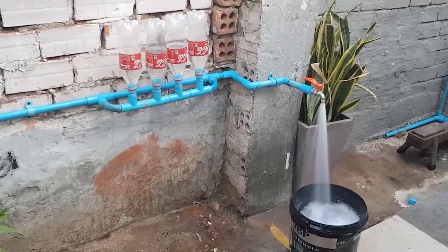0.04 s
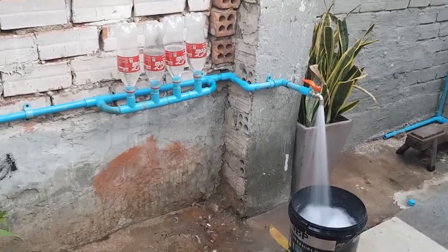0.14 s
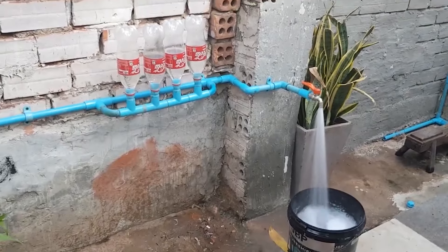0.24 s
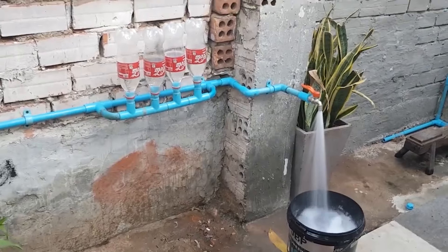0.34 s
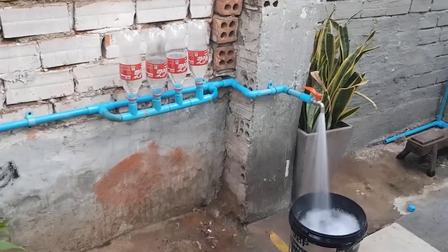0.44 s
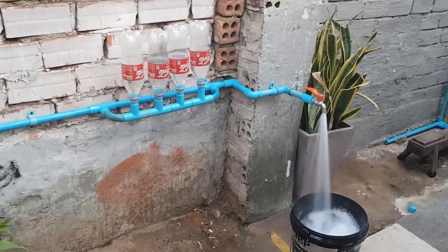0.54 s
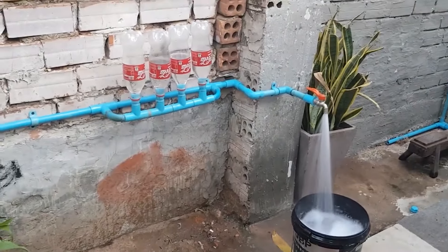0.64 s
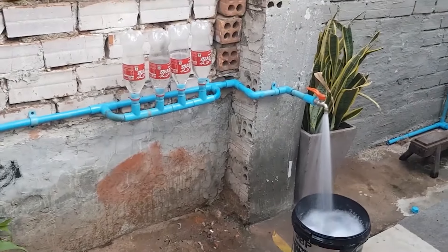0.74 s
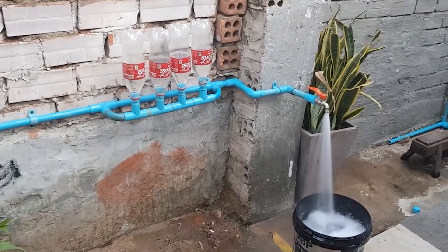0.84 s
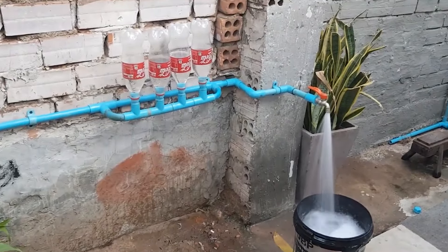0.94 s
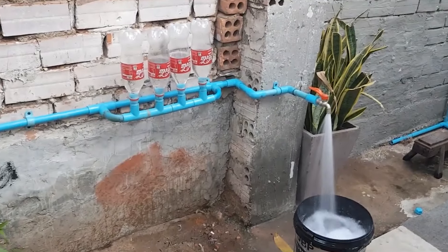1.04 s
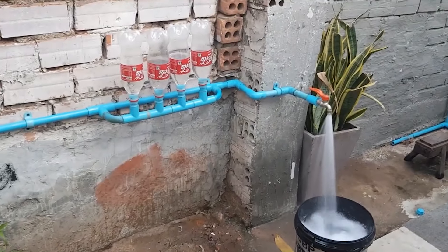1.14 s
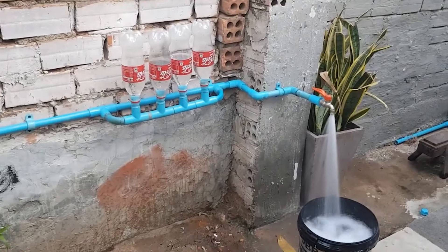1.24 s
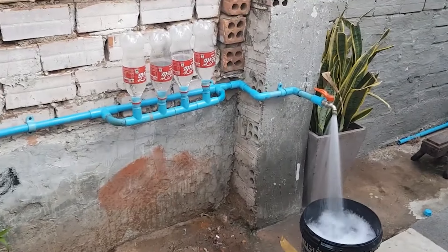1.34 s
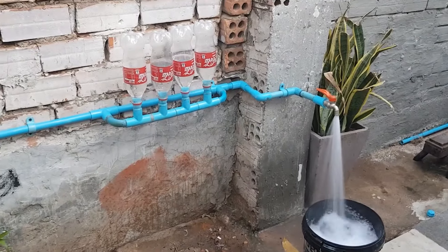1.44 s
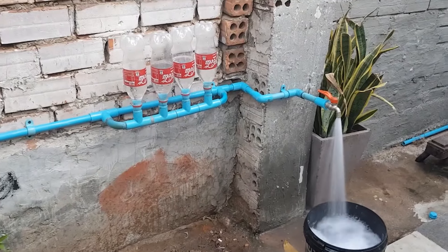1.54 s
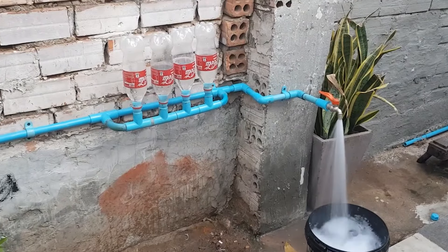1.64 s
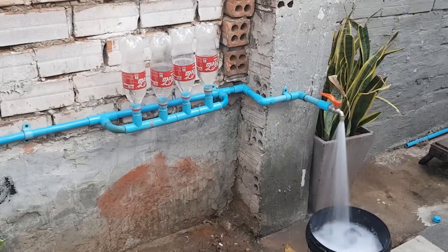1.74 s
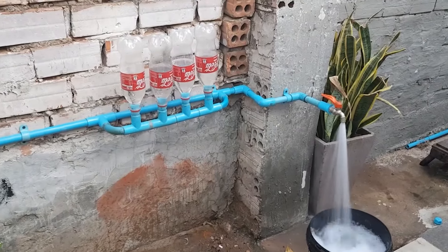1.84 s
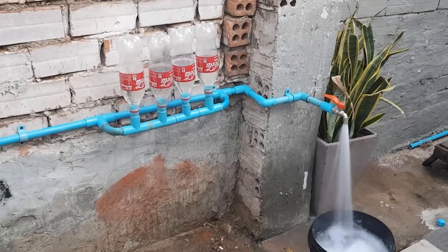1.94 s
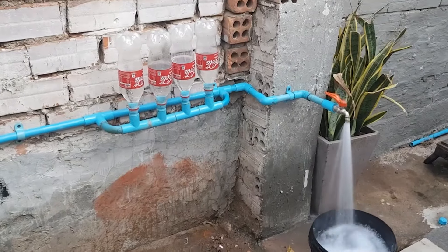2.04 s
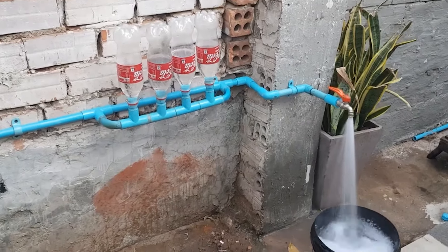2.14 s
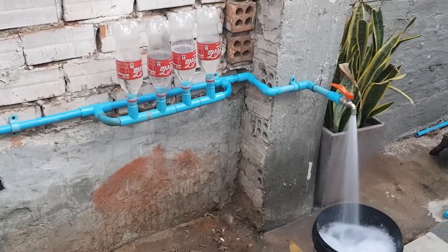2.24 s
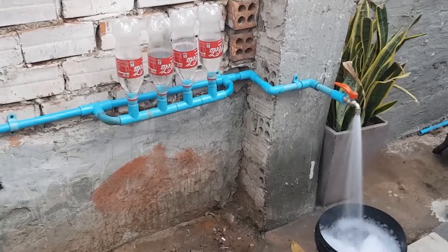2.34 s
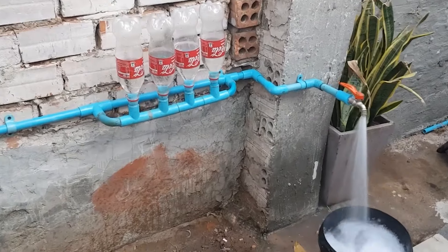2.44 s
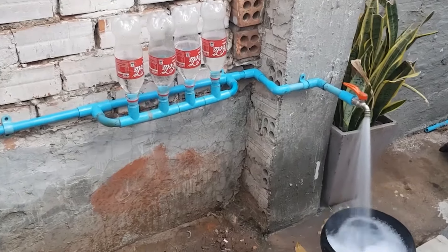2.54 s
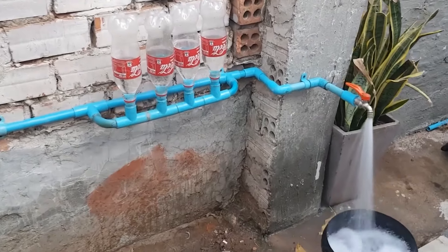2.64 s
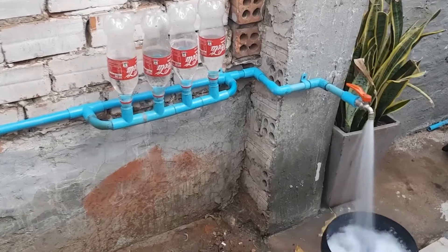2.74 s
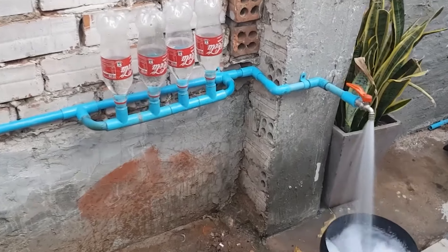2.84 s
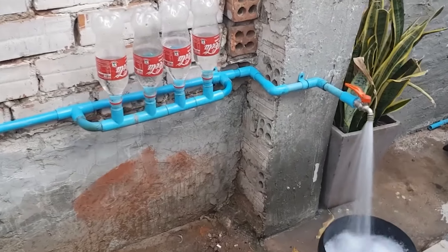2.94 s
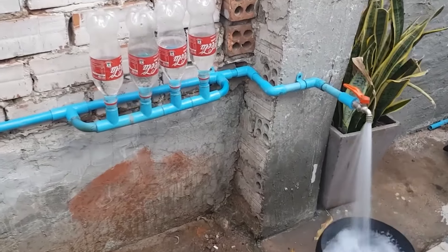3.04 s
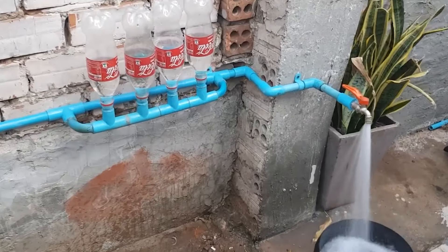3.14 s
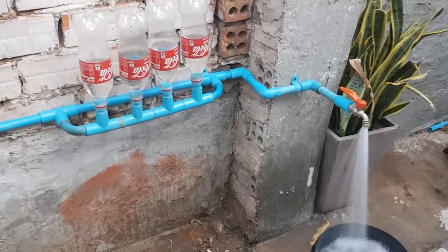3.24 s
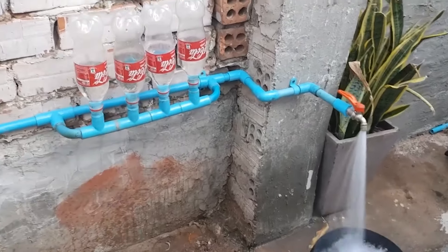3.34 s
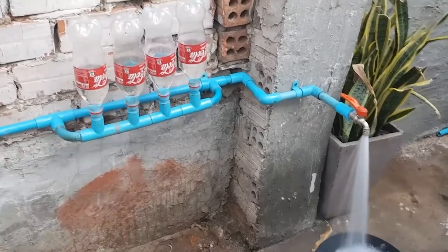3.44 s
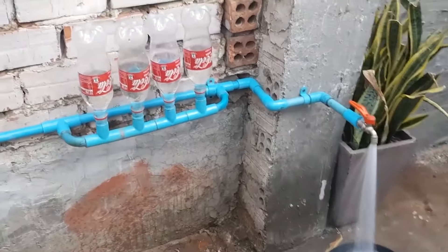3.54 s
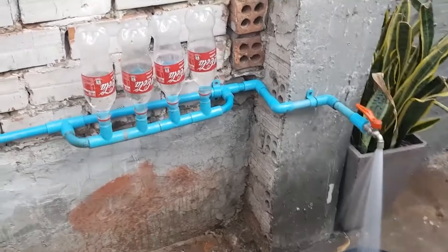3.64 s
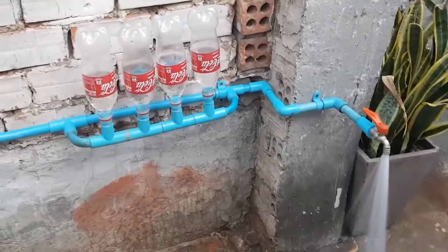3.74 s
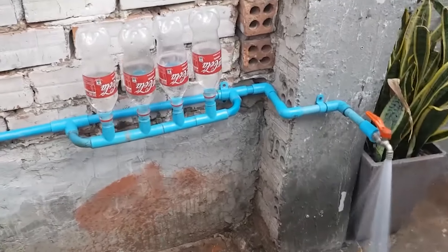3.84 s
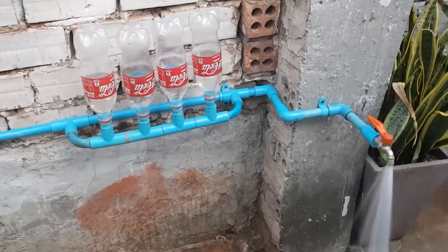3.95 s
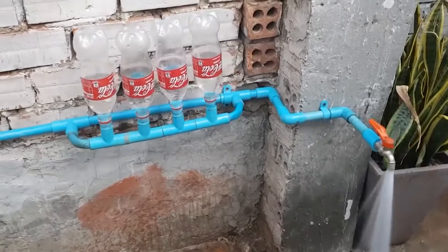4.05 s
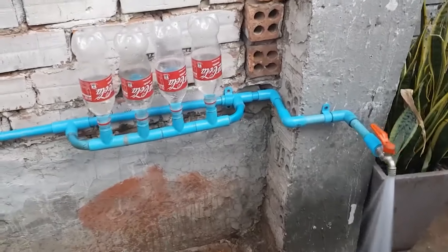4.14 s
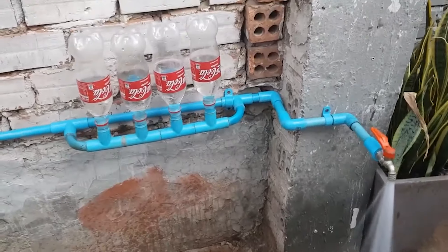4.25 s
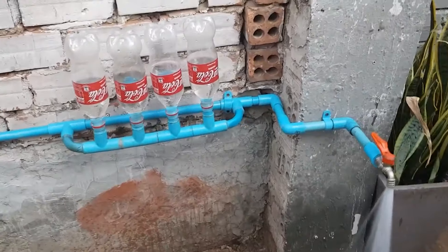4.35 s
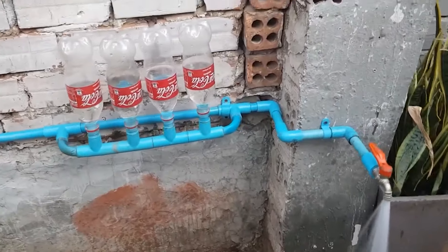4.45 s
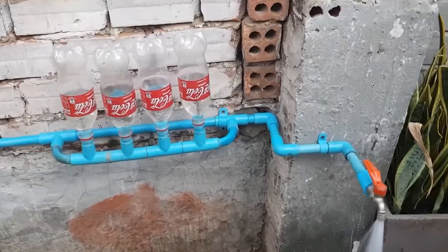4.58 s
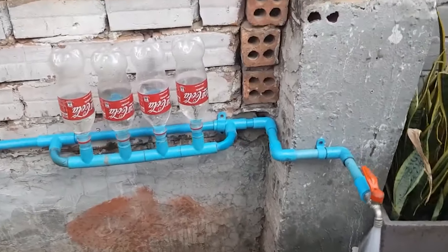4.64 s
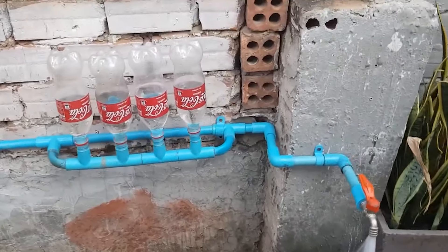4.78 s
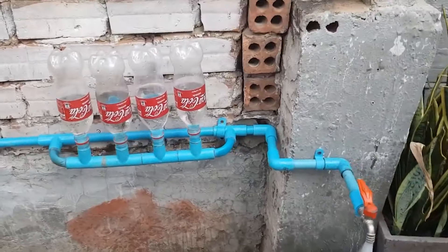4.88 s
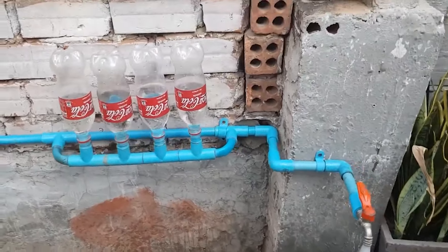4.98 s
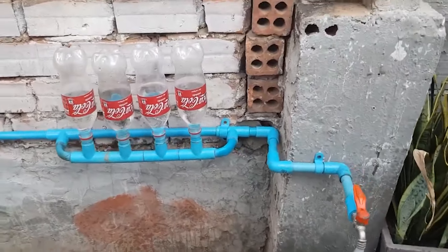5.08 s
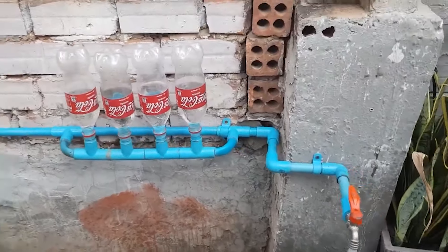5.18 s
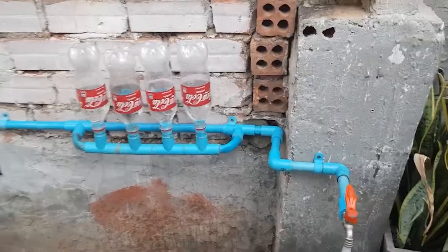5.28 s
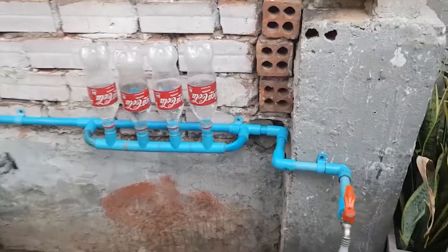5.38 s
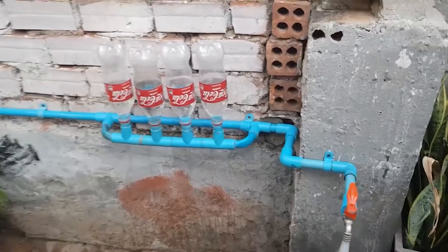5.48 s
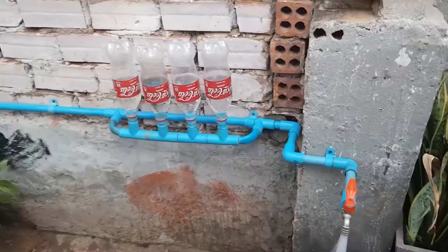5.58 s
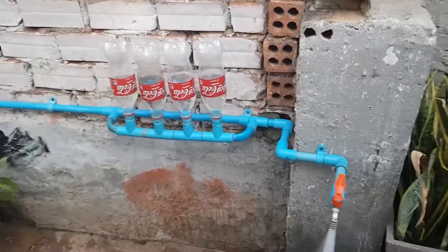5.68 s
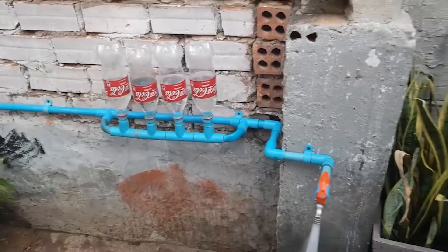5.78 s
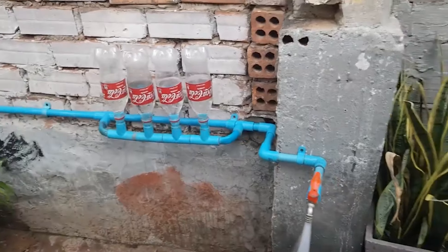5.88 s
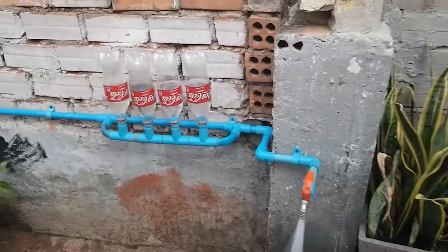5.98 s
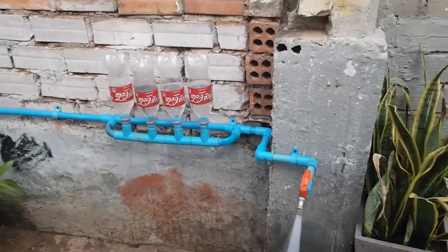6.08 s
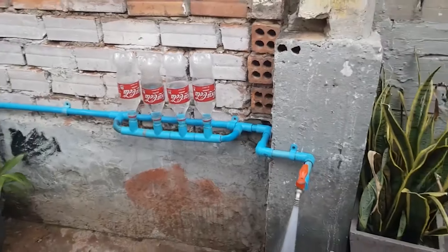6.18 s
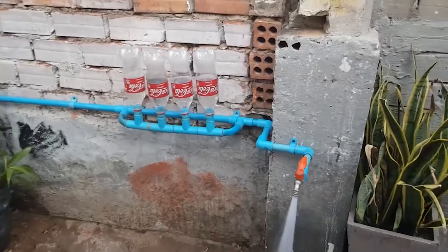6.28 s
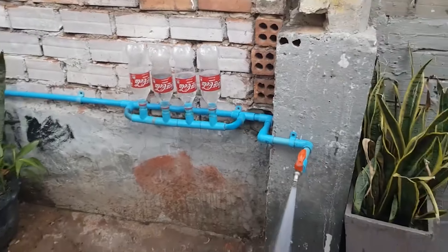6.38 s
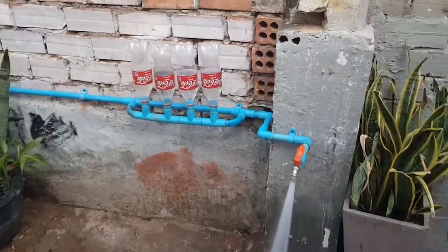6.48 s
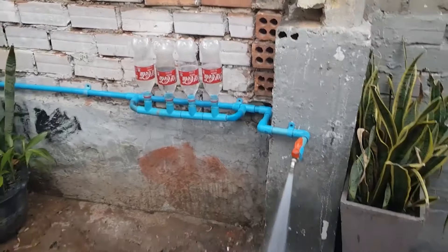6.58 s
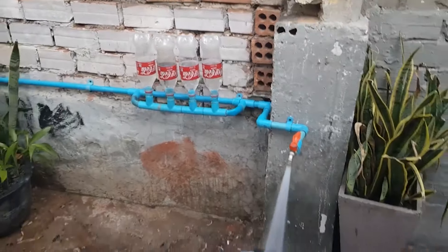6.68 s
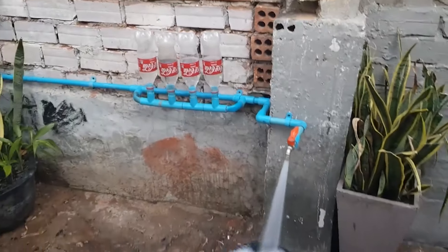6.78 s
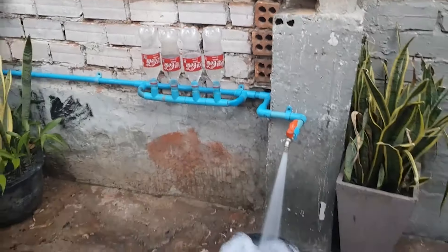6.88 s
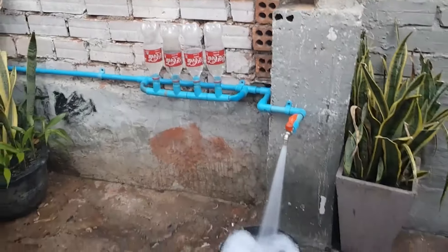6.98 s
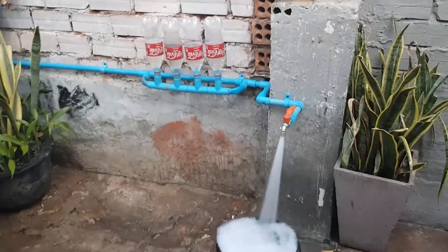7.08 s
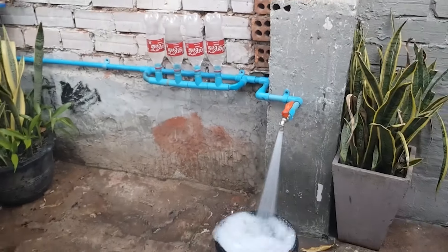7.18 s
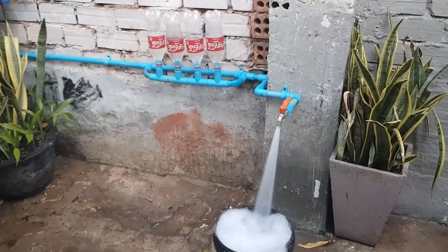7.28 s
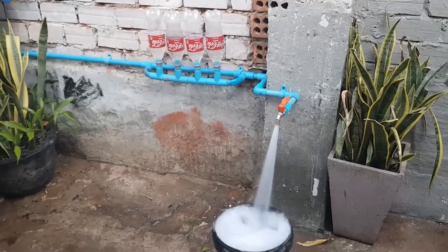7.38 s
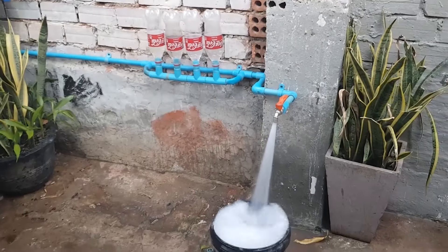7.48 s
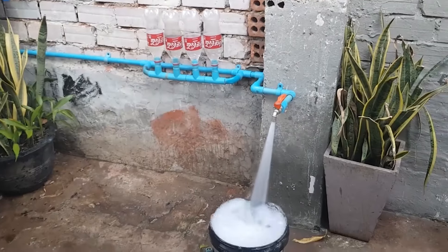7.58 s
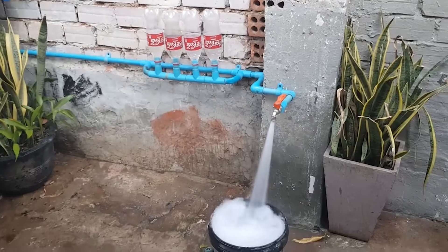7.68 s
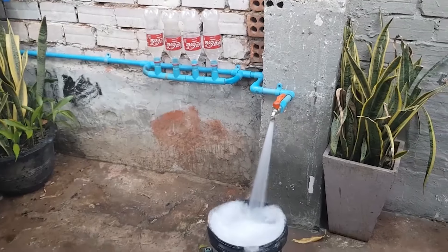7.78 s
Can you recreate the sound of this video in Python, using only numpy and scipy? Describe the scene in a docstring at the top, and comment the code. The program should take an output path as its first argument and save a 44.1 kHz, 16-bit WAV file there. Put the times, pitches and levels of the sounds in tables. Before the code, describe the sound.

Constant loud rush of water striking water in a bucket, close and outdoors by a brick wall. Bubbles gurgle and plop, low gulps sound beneath, and fine droplets patter and hiss. Slight air puffs buffet the moving stereo microphone early on. Midway it nears the tap and the hiss brightens, then it backs away with a hollow ring and slightly softer splashing, never stopping.

```python
"""A strong jet from a garden tap plunges into a foaming plastic bucket by a brick wall: shaped noise
and rising sine bubbles make the churn, and noise-driven resonances make the bucket hum.
Spray and bursting foam hiss on top as bands of noise and tiny tones; puffs of air buffet the microphone.
The microphone walks past, so echoes from wall and ground slowly sweep hollows through the rush."""
import sys
import numpy as np
from scipy import signal
from scipy.fft import rfft, irfft
from scipy.io import wavfile
from scipy.ndimage import uniform_filter1d

SR = 44100
rng = np.random.default_rng(int(sys.argv[2]) if len(sys.argv) > 2 else 0)


def int16_out(signal):
    """Quantize to a 16-bit WAV file."""
    q = np.round(np.clip(np.atleast_2d(signal).T, -1, 1) * 32767)
    wavfile.write(sys.argv[1], SR, q.astype(np.int16))


N = 344862
FRAME, HOP = 2048, 512  # spectral frame and its step [samples]
HZ = np.fft.rfftfreq(FRAME, 1 / SR)
FRAME_S = np.arange(N // HOP + 3) * HOP / SR
TIME = np.arange(N) / SR


def amp(db):
    """Turns decibels into a linear gain."""
    return 10 ** (np.asarray(db) / 20)


def unit(x):
    """Scales to rms 1."""
    return x / np.sqrt(np.mean(x ** 2) + 1e-20)


def follow(rows, times):
    """Reads the columns of a curve table at the given times, with straight lines between rows."""
    s, *columns = np.transpose(rows)
    return np.array([np.interp(times, s, column) for column in columns])


def colour(points):
    """Gain for each frequency of a short spectrum, joined by lines over log frequency."""
    hz, db = np.transpose(points)
    return amp(np.interp(np.log(HZ + 1), np.log(hz), db))


def resonance(hz, width_hz):
    """A bell-shaped resonance of gain 1 at its centre."""
    return 1 / (1 + ((HZ - hz) / (.78 * width_hz)) ** 2)


def waver(low_hz, high_hz):
    """Slow random wobble between two rates, rms 1."""
    hz = np.fft.rfftfreq(N, 1 / SR)
    band = (hz > low_hz) / np.sqrt(hz + 1) / (1 + (hz / high_hz) ** 4)
    return unit(irfft(rfft(rng.standard_normal(N)) * band, N))


def passing(spot_s, stay_s):
    """Rises smoothly from 0 to 1 and falls again around a moment."""
    return np.exp(-((TIME - spot_s) / stay_s) ** 2)


# the microphone nears the bucket, then backs away: (time [s], gain [dB])
NEARNESS = [(0, -1.5), (.85, -1.7), (1.25, -1.5), (2.05, -1), (2.3, 0), (3.6, 0), (4.2, 0), (4.65, 0.7),
            (5.0, .5), (5.83, -0.8), (6.05, -0.6), (7.0, -1.1), (7.3, -2.5), (7.82, -2)]


def nearness():
    """Gain in dB from the microphone's distance to the bucket."""
    return follow(NEARNESS, TIME)[0]


# path of the microphone: (time [s], lag of the left port [ms], left minus right [dB])
WALK = [(0, .09, -.2), (1.2, .11, -1.2), (3.8, .12, -.4), (5.3, .083, -.2), (6.2, .03, 1.2),
        (7.82, .013, 1)]


def rush(shape, level_db, direct, patchy_db, apart_hz=1700):
    """Countless tiny splashes merge into noise of this shape, heard at two microphone ports."""
    a, b, c, d, patches = rng.standard_normal((5, len(FRAME_S), len(HZ)))
    lag_ms = follow(WALK, FRAME_S)[0][:, None]
    direct = np.clip(direct, 0, 1)
    # direct sound reaches the left port late; the yard's diffuse sound is most alike in the bass
    direct_part = direct * np.exp(2j * np.pi * HZ * lag_ms / 10 ** 3)
    alike = direct_part + (1 - direct) * 0.96 * np.sinc(HZ / apart_hz)
    left = a + 1j * b
    right = alike * left + np.sqrt(np.maximum(1 - abs(alike) ** 2, 0)) * (c + 1j * d)
    # smoothed over time and frequency, the noise becomes lumpy
    patches = uniform_filter1d(patches, size=5, axis=0)
    patches = unit(uniform_filter1d(patches, size=24, axis=1))
    shape = shape / np.linalg.norm(shape, axis=-1, keepdims=True)
    z = np.array([left, right]) * shape * amp(patchy_db * patches)
    sound = signal.istft(z.transpose(0, 2, 1), nperseg=FRAME, noverlap=FRAME - HOP)[1][:, :N]
    return amp(level_db) * unit(sound)


def grains(low_hz, high_hz, per_s, cycles, rise, spread_db, width, count=36):
    """Single bubbles and drops: short dying tones that rise in pitch, of many sizes, rms 1."""
    out = np.zeros((2, N))
    for hz in np.geomspace(low_hz, high_hz, count) * rng.uniform(0.94, 1.03, count):
        age = np.arange(int(5 * cycles * SR / hz) + 2) * hz / SR / cycles  # in decay times
        envelope = np.exp(-age) * (1 - np.exp(-8 * age))
        ring = envelope * np.exp(2j * np.pi * cycles * (age + rise * age ** 2 / 2))
        at, draw = rng.integers(0, N, 4000), rng.exponential(1, 4000)
        n = int(per_s * N / SR / count)
        births = np.bincount(at[:n], amp(spread_db * np.minimum(draw[:n], 4)), N)
        turn = np.exp(1j * width * rng.standard_normal())  # each size reaches the ports out of step
        pair = np.array([ring.imag, (ring * turn).imag])
        out += signal.oaconvolve(births[None], pair, axes=1)[:, :N] * np.sqrt(hz)
    low_cut = signal.butter(2, low_hz / 2, "high", fs=SR, output="sos")
    return unit(signal.sosfilt(low_cut, out))


# spectrum of the deep rumble: (frequency [Hz], relative level [dB])
PLUNGE = [(20, -50), (40, -44), (62, -5), (100, 0), (130, -2), (175, 2.5), (205, -3.5), (245, 0),
          (300, -6.5), (400, -8.5), (700, -37)]
# loudness of the rumble: (time [s], level [dB])
RUMBLE = [(0, -45.5), (2.2, -44.2), (3.5, -45), (5.5, -45), (7.82, -46)]


def plunge():
    """The jet drives air deep under water: a low, lumpy rumble."""
    return rush(colour(PLUNGE), follow(RUMBLE, TIME)[0], direct=.1, patchy_db=1.3)


# the churning water, levels before nearness and layer trims: (time [s], pitch of the bubble cloud [Hz],
# its width [Hz], its level [dB], level of the splashing surface [dB])
CLOUD = [(0, 740, 432, -42.5, -38.5), (.7, 756, 444, -39, -38.5), (1.5, 760, 450, -39.5, -37),
         (2.3, 730, 340, -39.5, -38), (3, 776, 420, -40.5, -37), (3.8, 850, 483, -37.5, -37),
         (4.9, 1036, 600, -38, -37.5), (5.6, 950, 540, -36, -35.5), (6.4, 843, 320, -38, -38.5),
         (7.82, 800, 314, -38, -36)]


def bubble_cloud():
    """The cloud under the jet rings as a whole, in quick surges, and large bubbles gurgle out of it."""
    level_db = nearness() + follow(CLOUD, TIME)[2]
    pitch_hz, width_hz = follow(CLOUD, FRAME_S)[:2, :, None]
    cloud = rush(resonance(pitch_hz, width_hz) ** 2, level_db - 1.0, direct=0.89, patchy_db=1.0)
    gurgle = grains(680, 1000, per_s=70, cycles=20, rise=.004, spread_db=2.2, width=.4)
    surge = amp(.6 * waver(low_hz=10, high_hz=50))
    return (cloud + amp(level_db - 6.5) * gurgle) * surge


# modes of the bucket, each loudest at one spot of the walk: (frequency [Hz], width [Hz],
# level away from the spot [dB], lift at the spot [dB], time of the spot [s], stay in the spot [s])
BUCKET = [(165, 33, -58.5, 11, 4.2, 1.65), (356, 32, -55.5, 7.5, 1.1, 2.4), (523, 43, -64, 18, 4.55, 1.6),
          (577, 43, -63.5, 16.5, 2.74, 0.94), (707.4, 48.5, -49.5, 8, 2.2, 1.5)]
SLOSH, SLOSH_HZ = 0.01606, 7.1  # rms pitch bend [share of pitch], upper rate of the bend [Hz]


def bucket(side_db=-17.0):
    """The churning keeps the bucket's modes humming, almost alike at both ports; sloshing bends them."""
    hz, out = np.fft.fftfreq(N, 1 / SR), np.zeros((2, N))
    bent_time = np.cumsum(1 + SLOSH * waver(low_hz=0.96, high_hz=SLOSH_HZ)) / SR
    for mode_hz, width_hz, level_db, lift_db, spot_s, stay_s in BUCKET:
        churn = np.fft.fft(rng.standard_normal((2, N)))
        ring = np.fft.ifft(churn / (1 + 1j * (hz - mode_hz) / width_hz) ** 3)
        bend = np.exp(2j * np.pi * mode_hz * (bent_time - TIME))
        mid, side = unit((ring * bend).real)
        hum = mid + amp(side_db) * np.array([side, -side])
        out += amp(level_db + lift_db * passing(spot_s, stay_s)) * hum
    return out


# spectrum of the torn surface: (frequency [Hz], relative level [dB])
SPLASH = [(100, -28), (280, -1.5), (450, -4), (650, -5.5), (1000, 3), (1250, 1.8), (1500, -5.5),
          (1750, -0.5), (2150, -1.2), (2700, -5), (4000, -15)]
# a higher ring, heard over the rim as the microphone backs away:
# (time [s], pitch [Hz], width [Hz], level [dB])
UPPER_RING = [(3.0, 1610, 300, -56), (4.0, 1690, 500, -47), (4.6, 1890, 350, -43.5),
              (5.2, 1830, 350, -41.5), (5.9, 1700, 300, -43.5), (6.5, 1600, 440, -41.5),
              (7.0, 1490, 400, -43), (7.82, 1460, 440, -43.5)]


def splash():
    """The surface tears and folds, with a hollow ring and small bubbles plinking in it."""
    level_db = nearness() + follow(CLOUD, TIME)[3]
    wash = rush(colour(SPLASH), level_db - .9, direct=0.43, patchy_db=0.74)
    ring_hz, width_hz = follow(UPPER_RING, FRAME_S)[:2, :, None]
    ring_db = follow(UPPER_RING, TIME)[2]
    ring = rush(resonance(ring_hz, width_hz) ** 2, ring_db, direct=0.89, patchy_db=1.0)
    plinks = grains(1900, 3200, per_s=170, cycles=26, rise=.006, spread_db=2.3, width=.8)
    blips = grains(1000, 1900, per_s=40, cycles=26, rise=.005, spread_db=2.4, width=.6)
    return wash + ring + amp(level_db - 9.5) * plinks + amp(level_db - 13) * blips


# spectra of pattering droplets and fizzing foam: (frequency [Hz], relative level [dB])
SPRAY = [(900, -35), (1700, -16.5), (2200, -5.6), (2900, -4.3), (3600, -6.5), (4200, -7), (4800, -3.9),
         (6500, -4), (8200, -5.5), (9100, -8.5), (10500, -15), (14000, -49)]
FOAM = [(7000, -41), (9200, -9), (10000, -3), (11200, 0), (12200, 4), (13200, 4.5), (14500, 5.5),
        (15600, 6), (17000, -12)]
# lift of the spray's middle treble: (time [s], gain [dB])
SPRAY_TREBLE = [(0, -0.5), (2.1, -1), (2.4, -1), (2.9, .5), (3.4, 3), (4.3, 5), (4.9, -1.5), (5.7, -1),
                (6.0, 2), (6.6, -3), (7.82, 0.5)]
# the jet spatters harder for a moment: (time [s], lift of spray and foam [dB], length [s])
SPATTERS = [(0.48, 1.5, 0.048), (1.014, 1.5, 0.078), (1.294, 2, 0.036), (2.24, 1.2, .05),
            (4.086, 1.9, 0.054), (5.712, 1, 0.023), (5.88, 2.3, 0.061), (7.06, 0.8, .05)]
SPRAY_DB, FOAM_DB = -33, -29  # before nearness and spatters
FOAM_SHARE = 0.85  # how much of the nearness gain the foam takes
TREBLE_HZ, TREBLE_WIDTH_HZ = 7100, 3400


def spray():
    """Droplets patter and foam fizzes; both flutter and spatter with the jet as it breaks up."""
    spatter_db = sum(lift_db * passing(s, length_s) for s, lift_db, length_s in SPATTERS)
    spray_db = SPRAY_DB + nearness() + spatter_db
    foam_db = FOAM_DB + FOAM_SHARE * nearness() + spatter_db
    treble_db = follow(SPRAY_TREBLE, FRAME_S)[0][:, None]
    treble = amp(treble_db * resonance(TREBLE_HZ, TREBLE_WIDTH_HZ))
    patter = rush(colour(SPRAY) * treble, spray_db, direct=0.34, patchy_db=1.0)
    fizz = rush(colour(FOAM), foam_db, direct=0.25, patchy_db=1.25)
    drops = grains(2400, 7600, per_s=600, cycles=6, rise=.02, spread_db=3, width=1.8)
    pops = grains(10000, 16600, per_s=2200, cycles=4.8, rise=.01, spread_db=15.0, width=1.7)
    flutter = amp(.5 * waver(low_hz=4, high_hz=70))
    return (patter + fizz + amp(spray_db - 10) * drops + amp(foam_db - 16) * pops) * flutter


# hiss of the spout as the microphone passes close by the tap: (time [s], level [dB])
SPOUT = [(0, -60), (4.2, -48), (4.7, -36), (5.0, -36.5), (5.15, -32.5), (5.4, -35), (5.73, -29),
         (5.88, -38), (5.97, -50), (7.82, -60)]
SPOUT_HZ, SPOUT_WIDTH_HZ = 13600, 6100


def spout():
    """The jet leaves the tap with a fine hiss that swells only close by: one broad band of noise."""
    hiss = resonance(SPOUT_HZ, SPOUT_WIDTH_HZ) ** 2
    return rush(hiss, follow(SPOUT, TIME)[0], direct=.6, patchy_db=-1.0)


# puffs of air on the microphone: (time [s], level [dB], length [s], lower edge [Hz], upper edge [Hz],
# difference between the ports [dB])
PUFFS = [(0.195, -38.5, 0.055, 130, 380, -3), (0.41, -46, 0.045, 120, 270, -1),
         (0.467, -46, 0.061, 40, 110, 3), (1.22, -58, 0.054, 45, 80, 2), (2.22, -55, 0.12, 49.7, 110, -12),
         (6.08, -54, 0.098, 50, 110, -3), (7.55, -47, 0.097, 105, 150, -13)]


def breeze():
    """Small puffs of air buffet the two ports, each differently: swells of band-limited noise."""
    out, hz = np.zeros((2, N)), np.fft.rfftfreq(N, 1 / SR)
    for s, db, length_s, low_hz, high_hz, side_db in PUFFS:
        band = hz ** 4 / (hz ** 4 + low_hz ** 4) / (1 + (hz / high_hz) ** 4)
        mid, side = unit(irfft(rfft(rng.standard_normal((2, N))) * band, N))
        puff = mid + amp(side_db) * np.array([side, -side])
        out += amp(db) * puff * passing(s, length_s)
    return out


BUBBLE_GLIDE = 0.016  # share by which a bubble's pitch rises in each decay time


def bubbles(rows, gain_db, rise_s, decay_s):
    """Each large bubble swells, rings and dies away while its pitch creeps up."""
    out, t = np.zeros(N), np.arange(0, 7 * decay_s, 1 / SR)
    envelope = (1 - np.exp(-t / rise_s)) * np.exp(-t / decay_s)
    envelope = envelope / envelope.max()
    for s, db, hz in rows:
        ring = envelope * np.sin(2 * np.pi * hz * t * (1 + BUBBLE_GLIDE * t / decay_s / 2))
        part = out[round(s * SR):][:len(t)]
        part += amp(db + gain_db) * ring[:len(part)]
    return out


# large bubbles that plop out of the churn: (time [s], peak before the common gain [dB], pitch [Hz])
PLOPS = [(0.548, -30, 1030), (1.264, -30, 1000), (3.376, -25, 940), (4.861, -26, 1140), (5.177, -25, 1280),
         (5.366, -28, 1290), (6.371, -27, 980), (6.525, -22, 902)]


def plops():
    """Large bubbles burst out as very short, rising tones."""
    return bubbles(PLOPS, gain_db=-5.5, rise_s=.0015, decay_s=0.0076)


# big air pockets under the jet: (time [s], peak before the common gain [dB], pitch [Hz])
GULPS = [(0.578, -37, 186), (0.756, -39, 169), (2.889, -36.5, 175), (3.27, -36, 152), (3.559, -44, 147),
         (3.856, -32.5, 170), (4.143, -34, 161), (4.282, -38, 180.6), (4.53, -38, 152.5), (4.694, -41, 160),
         (5.28, -34, 156), (5.399, -39, 167), (7.476, -31.5, 139.5)]


def gulps():
    """Big air pockets gulp under the jet as deeper, longer tones."""
    return bubbles(GULPS, gain_db=-3.5, rise_s=0.008, decay_s=0.047)


# hollows where reflections cancel the direct sound, gliding as the microphone moves:
# (time [s], centre [Hz], width [Hz], cut, negative lifts [dB], gain of the port difference [dB])
LOW_HOLLOW = [(2.5, 250, 70, 1.5, 8), (4, 268, 80, 5, 6), (5.3, 292, 80, 5.5, 5), (6.2, 312, 70, -0.5, 8.5),
              (7.82, 330, 90, 2.5, 5)]
MIDDLE_HOLLOW = [(0, 480, 70, 1.7, 2), (2.0, 447, 80, 4, 0), (2.7, 480, 70, 1, 0), (3.3, 605, 50, 2, -1),
                 (4, 610, 60, 4.1, -1), (5, 680, 70, 4, 5), (6, 610, 70, 3, -3), (6.6, 537, 80, 2.5, 1),
                 (7.82, 500, 80, 2, -8)]
HIGH_HOLLOW = [(0, 1350, 171, 0, 2), (1.6, 1300, 150, 6.5, 2), (2.4, 1140, 160, 6.5, -1),
               (3.2, 1080, 90, 6, -2), (4, 1080, 100, 3, -1), (4.8, 1010, 100, -0.5, -5),
               (6.1, 1070, 110, 0, -3), (6.8, 1110, 130, 9, -4), (7.82, 1110, 130, 3, 0)]
UPPER_HOLLOW = [(3, 1700, 120, -3, 0), (4.2, 1620, 110, -3, 0), (5, 1540, 100, 3, 0),
                (5.7, 1490, 120, 0, 0), (6.2, 1240, 130, -0.5, 0), (6.8, 1210, 100, 2, 0),
                (7.82, 1200, 100, 5, 0)]
OUT_OF_STEP_WIDTH = 5.4  # the ports differ over a band this many times as wide as the hollow
# gain of what differs between the ports, before the hollows: (frequency [Hz], gain [dB])
PORT_DIFFERENCE = [(60, -3), (160, -9), (600, 2.5), (1000, 2.5), (1500, 4), (2000, -1.5), (2400, -2.8),
                   (3100, -.5), (3900, 1.5), (5000, -0.7), (8500, 1.5), (10500, .5), (12500, -1),
                   (15000, 0.5)]


def hollows(z, times):
    """The gliding hollows cut what the ports share and change what differs between them."""
    cut_db, apart_db = 0, 0
    for hollow in LOW_HOLLOW, MIDDLE_HOLLOW, HIGH_HOLLOW, UPPER_HOLLOW:
        centre_hz, width_hz, depth_db, difference_db = follow(hollow, times)[:, :, None]
        cut_db = cut_db + depth_db * resonance(centre_hz, width_hz) ** 2
        apart_db = apart_db + difference_db * resonance(centre_hz, OUT_OF_STEP_WIDTH * width_hz) ** 2
    mid = (z[0] + z[1]) / 2 * amp(-cut_db).T
    side = (z[0] - z[1]) / 2 * (amp(apart_db) * colour(PORT_DIFFERENCE)).T
    return np.array([mid + side, mid - side])


# two near echoes, changing as the microphone moves: (time [s], delay [ms], strength [0-1])
GROUND_ECHO = [(0, 0.82, 0), (1.5, 0.91, 0.1), (2.3, 1.38, 0.17), (3.8, 1.46, 0.38), (4.9, 1.4, 0.12),
               (5.6, 1.5, 0.3), (6.4, 1.353, 0.22), (7.82, 1.48, 0.26)]
WALL_ECHO = [(0, 3.8, 0.073), (2.3, 2.7, 0.1), (3, 2.3, 0.024), (3.8, 2.46, 0.19), (4.9, 2.32, 0.22),
             (5.6, 2.44, 0.37), (6.4, 2.18, 0.31), (7.82, 1.63, 0.058)]
ECHO_LOW_HZ, ECHO_HIGH_HZ = 153, 2100  # the band in which the echoes stay coherent


def yard(sound, ripple_db=3.0):
    """Ground and wall echoes comb the sound; far surfaces add a fine, slowly drifting ripple."""
    _, s, z = signal.stft(sound, SR, nperseg=FRAME, noverlap=FRAME - HOP)
    hz = HZ[:, None]
    coherent = hz / (hz + ECHO_LOW_HZ) / (1 + (hz / ECHO_HIGH_HZ) ** 2)
    for echo in GROUND_ECHO, WALL_ECHO:
        delay_ms, strength = follow(echo, s)
        z = z * (1 + strength * coherent * np.exp(-2j * np.pi * hz * delay_ms / 10 ** 3))
    # 16 far paths: lag [s], its drift [s per s], starting phase [rad]
    paths = rng.uniform([.005, -.0004, 0], [.022, .0004, 2 * np.pi], (16, 3))
    far = unit(sum(np.cos(2 * np.pi * hz * (lag_s + drift * s) + start) for lag_s, drift, start in paths))
    z = z * amp(ripple_db * far * hz / (hz + 300) / (1 + hz / 12000))
    return signal.istft(hollows(z, s), nperseg=FRAME, noverlap=FRAME - HOP)[1][:, :N]


def scene():
    """The bright layers drift from right to left as the microphone turns; the yard colours the rush."""
    pan_db = follow(WALK, TIME)[1]
    bright = (spray() + spout() + splash()) * amp(np.array([pan_db, -pan_db]) / 2)
    water = bright + bubble_cloud() + plunge() + bucket()
    return yard(water) + gulps() + plops() + breeze()


EDGE_HZ = 15680  # upper band limit


def record(dry):
    """A steep low-pass limits the band at the top."""
    low_pass = signal.firwin(701, EDGE_HZ, window=("kaiser", 8), fs=SR)
    return signal.oaconvolve(dry, low_pass[None], "same", axes=1)


dry = scene()
out = record(dry)
int16_out(out)
```